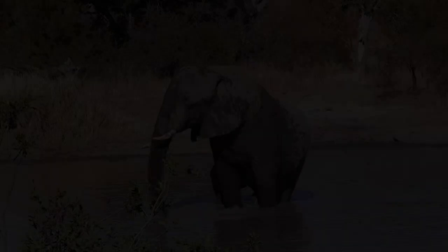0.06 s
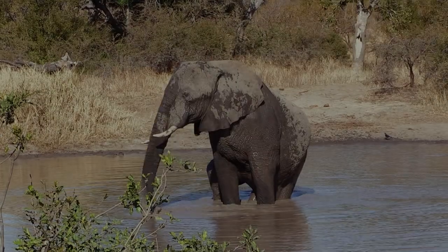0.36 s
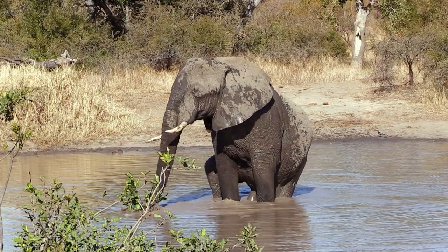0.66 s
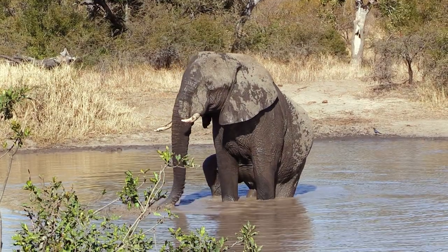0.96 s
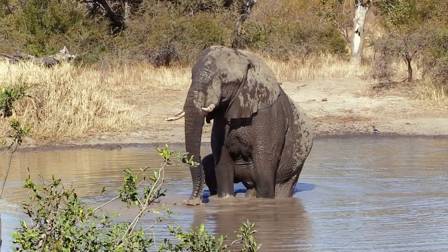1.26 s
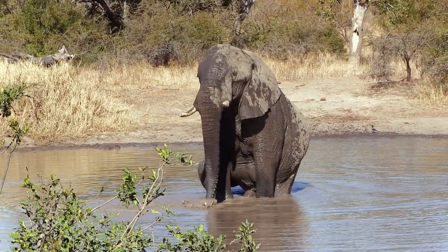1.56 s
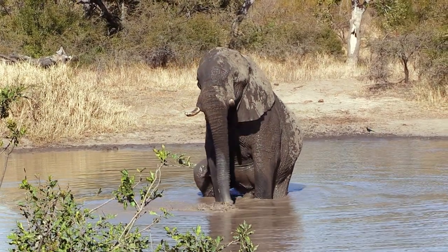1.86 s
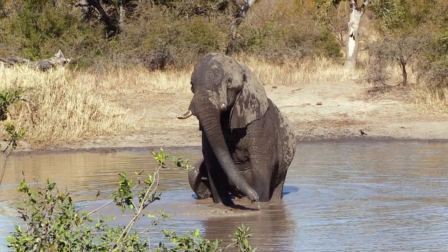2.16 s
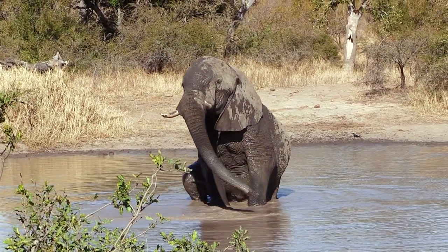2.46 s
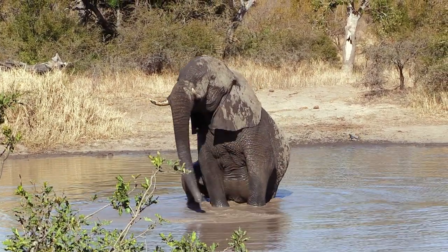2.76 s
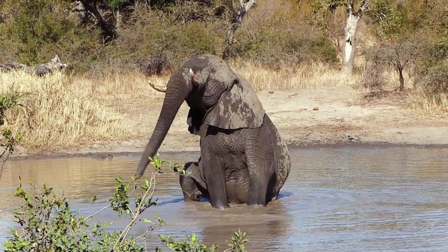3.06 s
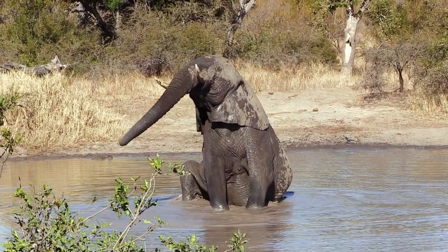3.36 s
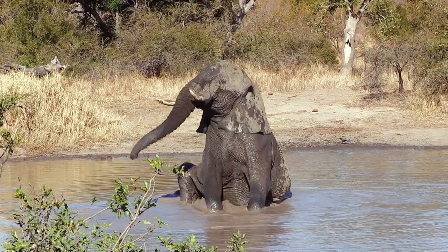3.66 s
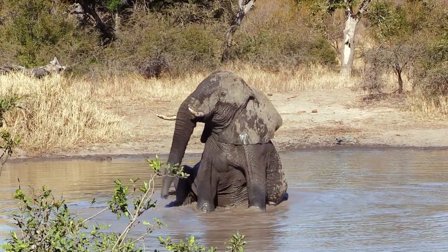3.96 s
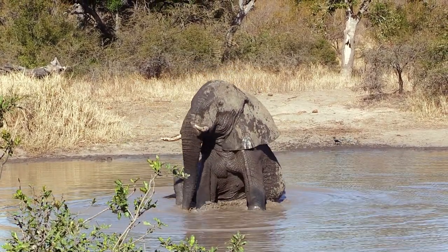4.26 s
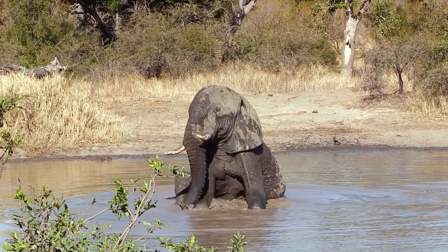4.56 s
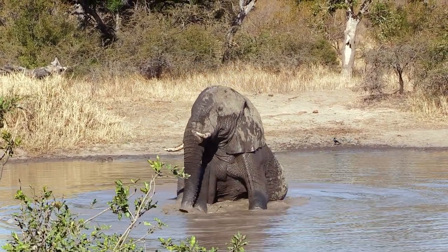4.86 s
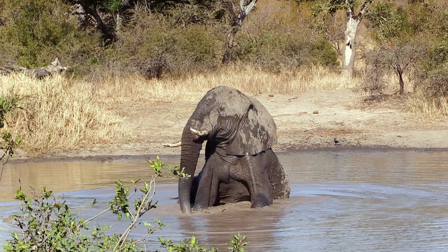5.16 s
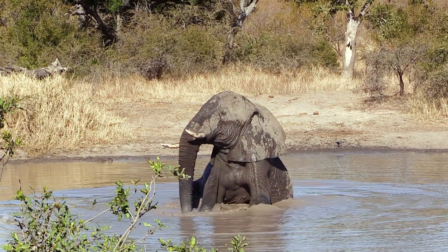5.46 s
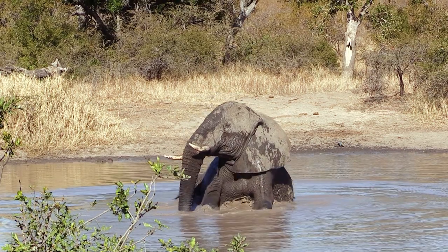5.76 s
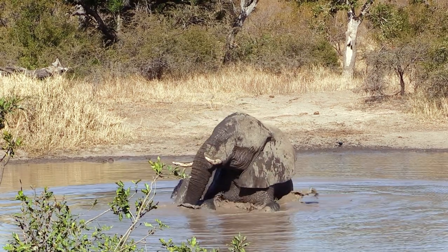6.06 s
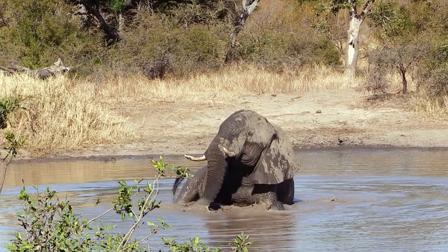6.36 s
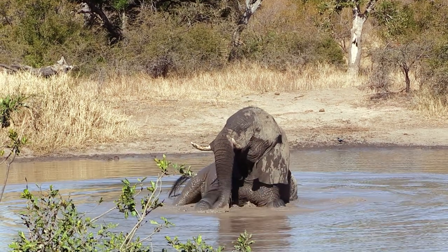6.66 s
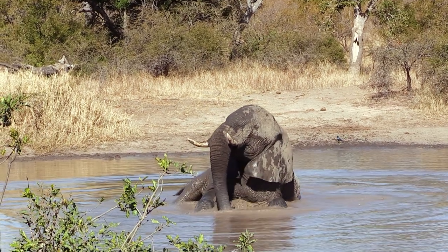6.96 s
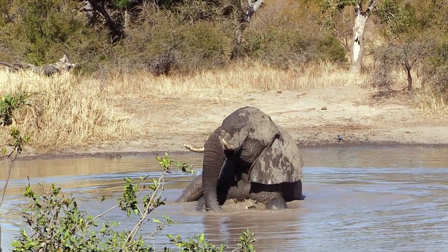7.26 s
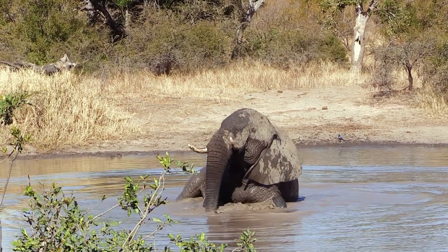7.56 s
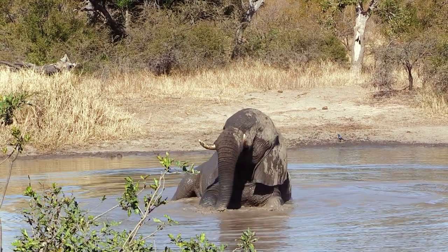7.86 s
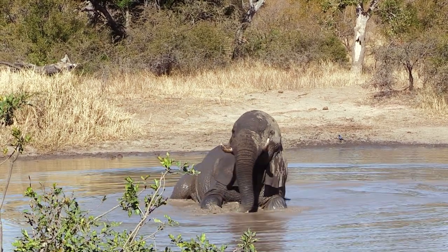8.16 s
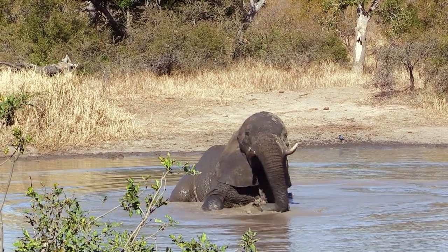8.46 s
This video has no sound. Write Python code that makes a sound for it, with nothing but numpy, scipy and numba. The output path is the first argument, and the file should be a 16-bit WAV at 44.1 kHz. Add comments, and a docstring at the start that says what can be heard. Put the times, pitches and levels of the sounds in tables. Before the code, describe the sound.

An elephant wallows in a waterhole some way from the microphone, stirring the water in soft, bubbly surges with small slaps and drips. Low wind rumble buffets the microphone throughout, growing stronger in the second half and often outweighing the water. Faint high bird whistles and falling chirps come near the start, briefly in the middle and near the end, over a quiet rustle of bush.

```python
"""At a waterhole in the bush, an elephant wallows some way off. Its trunk and legs churn the water into
spray, slaps and drips, trapping air bubbles that ring as resonators. Gusts buffet the microphone with
turbulent pressure swings. One small bird gives thin rising whistles from both sides of its syrinx,
another gives falling chirps. The far bush rustles, and the bank and trees return a faint echo."""
import sys
import numpy as np
from scipy import signal
from scipy.fft import rfft, irfft
from scipy.io import wavfile
from scipy.ndimage import uniform_filter1d, map_coordinates
from numba import njit

SR = 44100
rng = np.random.default_rng(int(sys.argv[2]) if len(sys.argv) > 2 else 0)


def file_out(sig):
    """Save sig as 16-bit WAV at sys.argv[1]."""
    # one column per channel
    cols = np.atleast_2d(sig).T
    # limit, then scale
    lim = np.clip(cols, -1, 1)
    pcm = np.round(lim * 32767).astype(np.int16)
    wavfile.write(sys.argv[1], SR, pcm)


N = 384552
TIME = np.arange(N) / SR


def undb(db):
    """Amplitude ratio of a level in decibels."""
    return 10 ** (np.asarray(db) / 20)


def unit(x):
    """Normalisation to an rms of 1."""
    return x / np.sqrt(np.mean(x ** 2))


def colour(x, points):
    """Spectral shaping by (Hz, dB) points, interpolated over log frequency."""
    hz, db = np.transpose(points)
    f = np.maximum(np.arange(N // 2 + 1) * SR / N, 1)
    return irfft(rfft(x) * undb(np.interp(np.log(f), np.log(hz), db)), N)


def below(x, hz):
    """Zero-phase low-pass: the part of a sound under a smooth crossover."""
    f = np.arange(N // 2 + 1) * SR / N
    return irfft(rfft(x) / (1 + (f / hz) ** 6), N)


def wander(rate_hz):
    """Slow random modulation with an rms of 1."""
    step = max(int(SR / rate_hz), 1)
    held = np.repeat(rng.standard_normal(N // step + 1), step)
    return unit(uniform_filter1d(held, step)[:N])


def add(out, start_s, x):
    """Superposition of a short sound on a longer one."""
    i = max(int(start_s * SR), 0)
    out[i:i + len(x)] += x[:max(len(out) - i, 0)]


def swell(start_s, length_s, attack_s, release_s):
    """Envelope with a linear rise, a hold to the end of its length and an exponential decay."""
    t = TIME - start_s
    return np.clip(t / attack_s, 0, 1) * np.exp(-np.maximum(t - length_s, 0) / release_s)


def bush(level_db=-48):
    """Shaped noise: the soft rustle of the far bush, with a low drone in it."""
    # Each row: frequency in Hz, relative spectral density of the rustle in dB.
    spectrum = [(100, -10.5), (180, 6), (235, -1), (272, 8.5), (320, -5.5), (620, -19.5), (720, -18),
                (1200, -28.5), (2300, -16.5), (3600, -21), (5600, -27.5), (15000, -41)]
    rustle = unit(colour(rng.standard_normal(N), spectrum))
    return rustle * undb(level_db + wander(2.925))


def echo(x, t60_s):
    """Diffuse reflection: the bank and trees return an exponentially decaying tail."""
    t = TIME[:SR]
    tail = rng.standard_normal(len(t)) * undb(-60 * t / t60_s) * (1 - np.exp(-t / .005))
    return signal.fftconvolve(x, tail / np.sqrt(np.sum(tail ** 2)))[:N]


def airflow(breeze_db=-37.5, freshening_db_per_s=1.2852):
    """Wind level in dB: gusts and a freshening breeze are incoherent, so their powers add."""
    # Each row: start of a gust in seconds, length in seconds, level in dB.
    gusts = [(0.742, 0.14, -28), (1.04, 0.3, -29), (1.696, .17, -25), (1.916, 0.18, -20), (2.299, .6, -28),
             (3.299, 0.92, -26.5), (4.63, 0.34, -25.5), (5.05, 0.54, -27), (5.72, 0.16, -18.5),
             (6.259, 0.43, -19), (6.74, 0.29, -19), (7.118, .14, -22), (7.367, 0.39, -21.5),
             (7.821, 0.23, -20), (8.28, 0.38, -16)]
    gust_power = sum((undb(db) * swell(start, length, attack_s=.1, release_s=.085)) ** 2
                     for start, length, db in gusts)
    return 10 * np.log10(gust_power + undb(breeze_db + freshening_db_per_s * TIME) ** 2)


def wind(shedding_per_db=.039, turbulence_db=4.0):
    """Vortex shedding at the microphone: faster flow makes quicker eddies and a higher rumble."""
    # Each row: frequency in Hz at a relative speed of 1, relative spectral density in dB.
    spectrum = [(15, -24), (28, 3), (50, 5), (80, 3), (120, -5.5), (170, -13), (240, -27), (340, -40.5),
                (500, -50), (1000, -73)]
    gust_db = airflow()
    flutter_db = turbulence_db * np.tanh(wander(26))
    speed = np.exp(shedding_per_db * (np.maximum(gust_db, -31) + 23.5 + 0.902 * flutter_db))
    rumble = unit(colour(rng.standard_normal(N), spectrum))
    rumble = map_coordinates(rumble, [np.cumsum(speed) % (N - 1)], order=3)
    # level the rumble, so that the gusts carry the slow swells
    local_rms = uniform_filter1d(rumble ** 2, size=SR // 14) ** .5
    return unit(rumble / local_rms) * undb(gust_db + flutter_db)


def buffets(eddy_hz=80, width_cycles=0.31, wake_db=-9, quickening_per_db=0.035):
    """A passing eddy gives one pressure swing, quicker if stronger, and trails two weaker ones."""
    # Each row: time an eddy strikes the microphone in seconds, peak of its envelope in dB.
    eddies = [(0.809, -16), (1.176, -14), (1.372, -14.5), (2, -10), (2.047, -6), (2.539, -14.5),
              (3.047, -12), (3.183, -8), (3.553, -4.5), (3.592, -11), (3.742, -13.5), (4.151, -19),
              (4.72, -14.5), (4.914, -11.5), (4.961, -11), (5.256, -8), (5.436, -3.5), (5.767, -3),
              (5.835, -8.5), (5.862, -8), (6.412, -3.5), (6.622, -3), (6.789, -7.5), (6.929, -5),
              (6.972, -5), (6.997, -3), (7.081, -5.5), (7.209, -9), (7.709, -7.5), (7.861, -4),
              (7.93, -3.5), (8.353, -2), (8.401, -4), (8.437, -2), (8.569, 1)]
    out, t = np.zeros(N), TIME[:SR // 10] - .05
    for strike, db in eddies:
        for k, (size, lag, phase) in enumerate(rng.uniform(-0.88, 1, (3, 3))):
            cycles = t * eddy_hz * np.exp(0.34 * size + quickening_per_db * (db + 7.5))
            envelope = np.exp(-(cycles / width_cycles) ** 2 / 2)
            swing = envelope * np.cos(2 * np.pi * cycles + np.pi * phase)
            delay_s = k * (0.01374 + 0.0035 * lag)
            add(out, strike + t[0] + delay_s, undb(db + k * wake_db) * swing)
    return out


def note(length_s, start_hz, end_hz, bend, waver, flutter_db, taper):
    """Frequency modulation: a near-pure glide flattens out and flutters on its way through the bush."""
    count = int(length_s * SR)
    u = np.arange(count) / count
    knots = np.arange(0, length_s + .02, .005)
    shake, fade = (np.interp(u * length_s, knots, row) for row in rng.standard_normal((2, len(knots))))
    glide_hz = start_hz + (end_hz - start_hz) * (u + bend * u * (1 - u))
    tone = np.sin(2 * np.pi * np.cumsum(glide_hz * (1 + waver * shake)) / SR)
    return tone * np.sin(np.pi * u) ** taper * undb(flutter_db * fade)


def whistling_bird(second_voice_shift_hz=1950, second_voice_db=-15):
    """Biphonation: both sides of the syrinx sound at once, each with its own rising pitch."""
    # Each row: start in seconds, length in seconds, first and last pitch in Hz, level in dB.
    whistles = [(0.533, .28, 6070, 7740, -53), (0.897, 0.16, 6060, 7000, -54.5),
                (5.455, .255, 6306, 7660, -51), (7.842, 0.32, 6020, 7860, -48.5),
                (8.228, 0.29, 5944, 7364, -51.5)]
    out = np.zeros(N)
    for start, length, start_hz, end_hz, db in whistles:
        for shift_hz, voice_db, bend in [(0, 0, .58), (second_voice_shift_hz, second_voice_db, .88)]:
            voice = note(length, start_hz + shift_hz, end_hz + shift_hz, bend,
                         waver=0.0055, flutter_db=4.0, taper=0.81)
            add(out, start, undb(db + voice_db) * voice)
    return out


def chirping_bird(reflection_s=.05, reflection_db=-12):
    """Each downward slur is doubled by a discrete reflection off the trees."""
    # Each row: start in seconds, length in seconds, first and last pitch in Hz, level in dB.
    chirps = [(0.314, 0.038, 4450, 4000, -52), (0.388, 0.08, 4200, 3160, -55),
              (0.655, 0.083, 4430, 2930, -52), (2.624, 0.09, 4420, 2550, -54.5),
              (2.752, 0.027, 6500, 4830, -58), (2.795, 0.13, 5520, 2830, -53.5),
              (5.128, .06, 5400, 4120, -57), (7.711, 0.067, 4736, 3399, -53.5),
              (7.925, 0.041, 4870, 3900, -54)]
    out = np.zeros(N)
    for start, length, start_hz, end_hz, db in chirps:
        chirp = note(length, start_hz, end_hz, bend=0.39, waver=0.012, flutter_db=6.0, taper=0.63)
        add(out, start, undb(db) * chirp)
        add(out, start + reflection_s, undb(db + reflection_db) * chirp)
    return out


@njit
def bubbles(n, start_s, hz, cycles, amplitude, rise):
    """Bubble resonance: each is a damped oscillator whose pitch climbs by the fraction `rise`."""
    out = np.zeros(n)
    for k in range(len(start_s)):
        first, count = int(start_s[k] * SR), int(cycles[k] * SR / hz[k]) + 2
        phase = 0.
        for i in range(min(count, n - first)):
            phase += 2 * np.pi * hz[k] * (1 + rise * i / count) / SR
            out[first + i] += amplitude[k] * np.exp(-5 * i / count) * np.sin(phase)
    return out


def drips(ring_s=0.036):
    """Air entrainment: a drop off the trunk traps one bubble, which rings with a rising pitch."""
    # Each row: start in seconds, peak level in dB, starting pitch in Hz.
    drops = [(2.2, -32.5, 1230), (2.308, -39, 1094), (2.386, -35, 1430), (3.06, -47, 2610),
             (3.127, -40, 937), (3.148, -38, 2900), (3.155, -36.5, 2260), (3.169, -40, 3450),
             (3.609, -36, 4480), (8.487, -32, 1110), (8.588, -41, 2076)]
    start, db, hz = (np.array(column, float) for column in zip(*drops))
    return bubbles(N, start, hz, hz * ring_s, undb(db), rise=0.14)


def slaps(pitch_scatter=0.332, splash_q=1 / 0.87, plop_db=-2.5, splash_db=-2, mist_db=-20):
    """Impact of a lump of water: a main bubble and a cluster near its size ring in a burst of spray."""
    # Each row: start in seconds, level at the source in dB, centre frequency in Hz, length in seconds.
    impacts = [(0.514, -43.5, 2500, 0.019), (1.28, -34, 2540, 0.0069), (2.366, -34.5, 1730, 0.01),
               (2.673, -47, 922, 0.011), (3.126, -39.5, 1250, 0.0072), (3.311, -36.5, 3050, 0.019),
               (3.61, -38, 3000, 0.0039), (4.016, -41, 597, 0.035), (4.315, -33, 1260, 0.0081),
               (4.992, -40, 644, 0.007), (5.098, -33.5, 1230, 0.0062), (5.592, -35.5, 1150, 0.0043),
               (5.629, -30.5, 1244, 0.0075), (5.638, -31, 3450, 0.038), (5.643, -34, 585, 0.025),
               (5.651, -27.5, 1600, 0.0036), (5.662, -31, 2940, 0.031), (6.001, -30.5, 1560, 0.0058),
               (6.01, -29.5, 1520, 0.012), (6.118, -41, 6447, 0.015), (6.229, -39.5, 1590, .006),
               (6.834, -39.5, 1782, 0.031), (6.949, -38, 1440, 0.015), (7.408, -34.5, 1620, 0.0055)]
    out, t = np.zeros(N), TIME[:SR // 5]
    for start, db, hz, length in impacts:
        onset, ring, strength, _ = rng.random((120, 4)).T
        pitch = np.clip(hz * np.exp(pitch_scatter * rng.standard_normal(len(onset))), 350, 13000)
        cluster = unit(bubbles(len(t), onset * t[-1], pitch, 5 + 16 * ring, strength - .5, rise=0.26))
        plop = 2 * np.sin(2 * np.pi * hz * t * (1 + 3 * t)) * np.exp(-t / 0.012)
        noise = rng.standard_normal(len(t))
        splash = unit(signal.lfilter(*signal.iirpeak(hz, splash_q, fs=SR), noise))
        mist = (length / 0.024) ** .5 * noise
        # long slaps are soft: they build more slowly
        envelope = (1 - np.exp(-8 * t / length)) * np.exp(-(t / length) ** 2 / 2)
        burst = cluster + undb(plop_db) * plop + undb(splash_db) * splash + undb(mist_db) * mist
        burst *= envelope
        rms = np.sqrt(np.sum(burst ** 2) / (length * SR))
        add(out, start, undb(db) * burst / rms)
    # The way across the pool dulls the treble. Each row: frequency in Hz, gain in dB.
    path = [(200, 6.0), (500, -0.5), (3700, -0.5), (4600, -7.0), (7000, -12.0), (11000, -8.5),
            (15000, -22)]
    return colour(out, path)


def fizz(per_second, extra_cycles, spread_db, low_hz=400, high_hz=15000):
    """A bubble swarm with power-law amplitudes: many faint, a few loud, the big low ones varying most."""
    onset, height, chance, polarity, ring = rng.random((int(per_second * N / SR), 5)).T
    hz = low_hz * (high_hz / low_hz) ** height
    strength_db = -spread_db * (1 - height / 2) * np.log(np.maximum(chance, .01))
    amplitude = undb(strength_db) * np.sign(polarity - .5) * hz ** 1.01
    return unit(bubbles(N, onset * N / SR, hz, 2 + extra_cycles * ring ** 2, amplitude, rise=0.19))


def stirring(attack_s=0.17, drain_s=0.26, lapping_db=-54.5, lapping_share_db=-13.5):
    """Strokes and lapping ripples add in power: the water's level and share of big bubbles, in dB."""
    # Trunk and legs sweep through the water.
    # Each row: start in seconds, length in seconds, level in dB, share of big bubbles in dB.
    strokes = [(0.364, 0.46, -52, 0.5), (0.857, 0.43, -42.5, -6.5), (1.29, 0.89, -44.5, -10),
               (3.08, 0.12, -46.5, -8), (3.494, 0.77, -41.5, -8), (3.936, 0.34, -38.5, -3.5),
               (4.352, 0.38, -42, -6), (4.843, 0.21, -43.5, -10), (5.132, 1, -46, -6),
               (5.904, 0.33, -42, -12.5), (6.135, 0.49, -39.5, -8.5), (6.705, 0.23, -42.5, -9.5),
               (7.107, 0.61, -44, -14), (7.798, 0.7, -47.5, -8)]
    stroke_power = np.array([(undb(db) * swell(start, length, attack_s, drain_s)) ** 2
                             for start, length, db, _ in strokes])
    shares = undb([share_db for *_, share_db in strokes]) ** 2
    lapping_power = undb(lapping_db) ** 2
    deep_power = shares @ stroke_power + 10 ** (lapping_share_db / 20) * lapping_power
    total_power = stroke_power.sum(axis=0) + lapping_power
    return 10 * np.log10(total_power), 10 * np.log10(deep_power / total_power)


def churn():
    """Air entrainment in surges: deep strokes trap big, low bubbles, and falling drops add spray."""
    # Each row: frequency in Hz, gain in dB that shapes the sound of the churned water.
    spectrum = [(260, -11), (450, -10.5), (579, -5), (633, -5.5), (712, -10), (1310, 0), (2010, -4),
                (3230, -4.5), (3630, -1), (4150, -10.5), (4530, -11.5), (7280, -27.5), (8200, -26),
                (10200, -28.5), (15500, -41.5)]
    level_db, depth_db = stirring()
    hiss = undb(-3) * rng.standard_normal(N)  # countless tiny drops merge
    water = colour(fizz(per_second=5500, extra_cycles=38.7, spread_db=3.0) + hiss, spectrum)
    deep, body = below(water, hz=1030), below(water, hz=5530)
    # harder, deeper churning throws more fine spray
    spray_db = -22.0 + 0.26 * (level_db + 46.0) + 0.5 * (depth_db + 7) + 1.4 * wander(35)
    spray = undb(spray_db) * unit(water - body)
    small_bubbles = undb(-1.31) * unit(body - deep)
    big_bubbles = undb(depth_db - 2.0 + 1.35 * wander(18)) * unit(deep)
    return (small_bubbles + big_bubbles + spray) * undb(level_db + wander(24))


def scene():
    """Mid-side stereo: water lies ahead, birds and bush spread wider, wind is alike in both ears."""
    # Each row: frequency in Hz, gain of the side signal in dB.
    width = [(250, -37.5), (550, -12.5), (1100, -12), (2200, -19.5), (3500, -43.5), (5000, -31.5),
             (13000, -23)]
    water = churn() + slaps() + drips()
    song = whistling_bird() + chirping_bird()
    reflections = undb(-14.5) * echo(water + song, t60_s=0.3)
    mid = water + song + reflections + bush() + wind() + buffets()
    scattered = echo(water + undb(20.5) * song, t60_s=0.071)
    side = colour(scattered + undb(19) * bush(), width)
    return np.array([mid + side, mid - side])


def record(dry, fade_start_s=0.057, fade_s=0.8, ceiling=.95, cutoff_hz=15400):
    """After a fade-in, soft saturation rounds the strongest gusts and a low-pass cuts the top."""
    faded = dry * np.clip((TIME - fade_start_s) / fade_s, 0, 1) ** 1.07
    rounded = faded / (1 + (faded / ceiling) ** 4) ** .25
    return signal.sosfilt(signal.ellip(10, .1, 80, cutoff_hz, fs=SR, output="sos"), rounded)


dry = scene()
out = record(dry)
file_out(out)
```